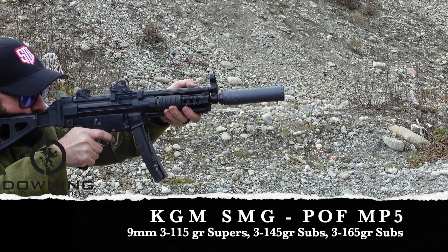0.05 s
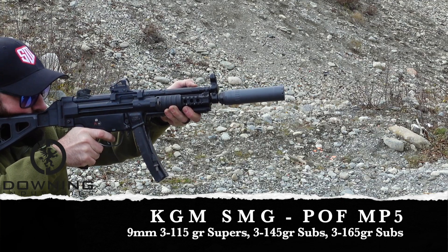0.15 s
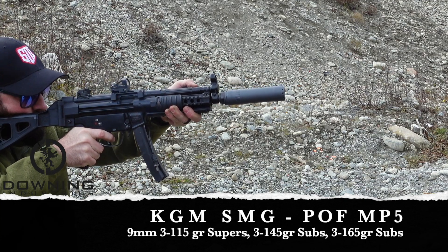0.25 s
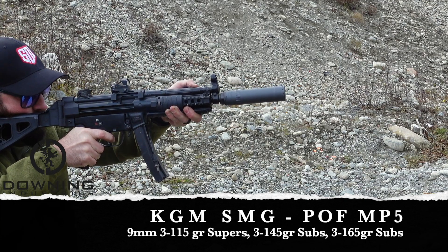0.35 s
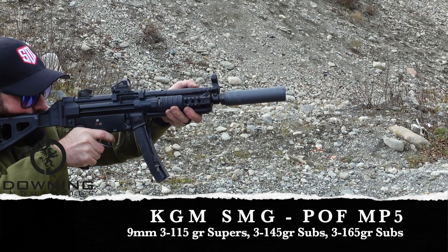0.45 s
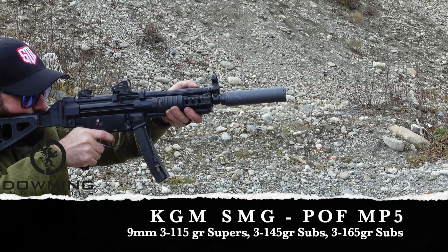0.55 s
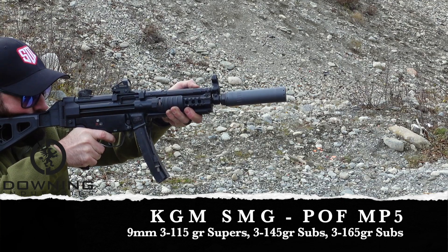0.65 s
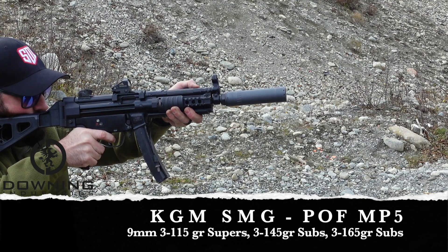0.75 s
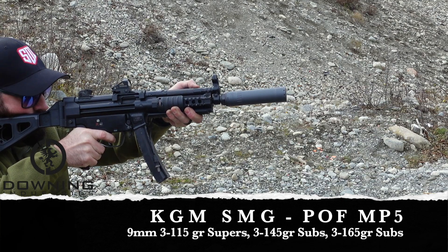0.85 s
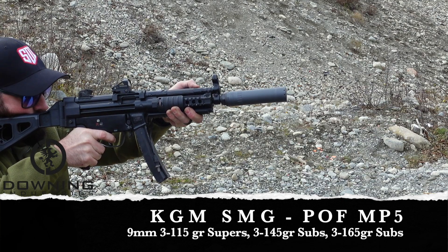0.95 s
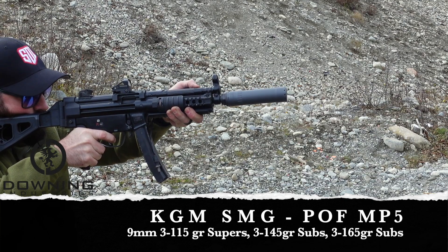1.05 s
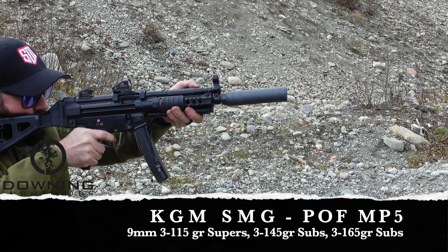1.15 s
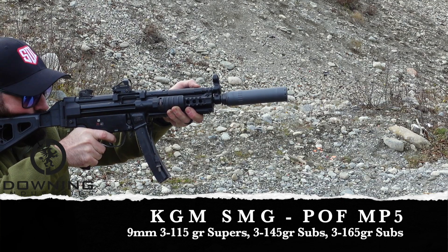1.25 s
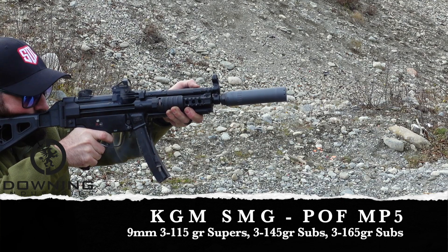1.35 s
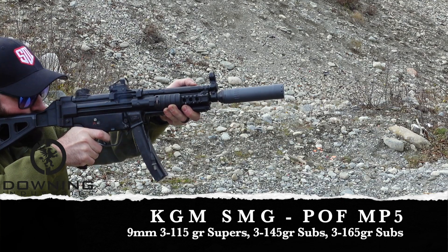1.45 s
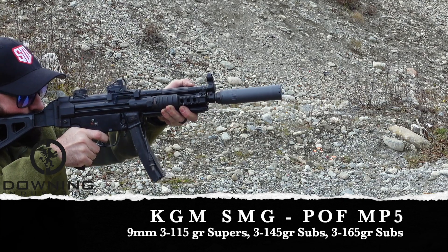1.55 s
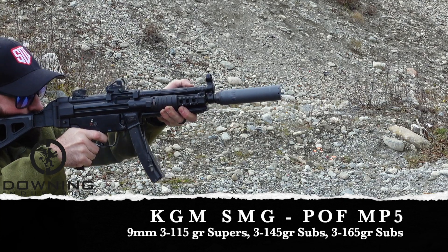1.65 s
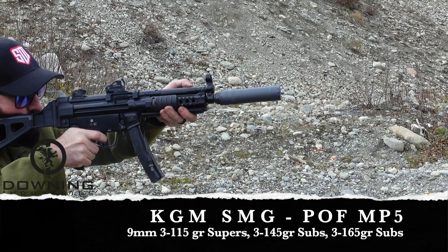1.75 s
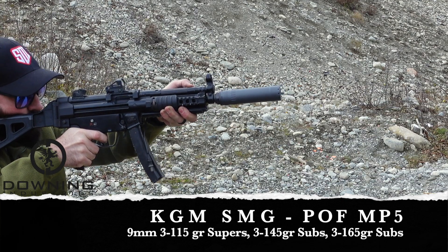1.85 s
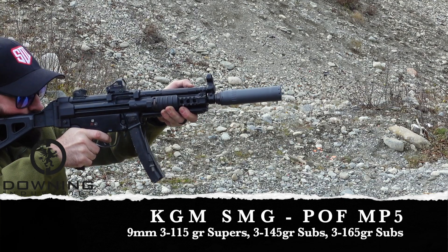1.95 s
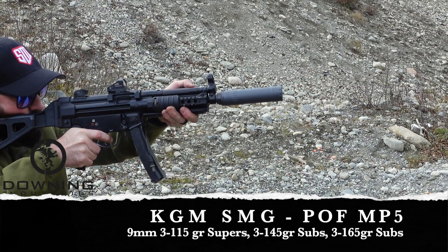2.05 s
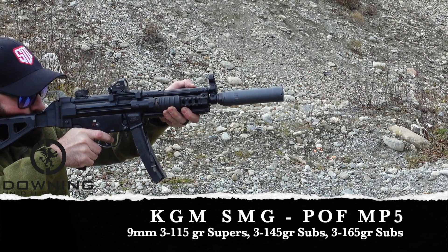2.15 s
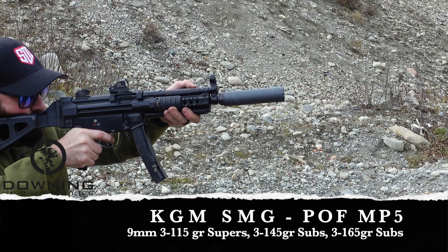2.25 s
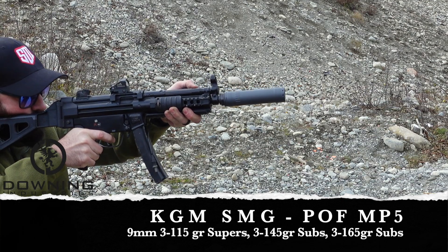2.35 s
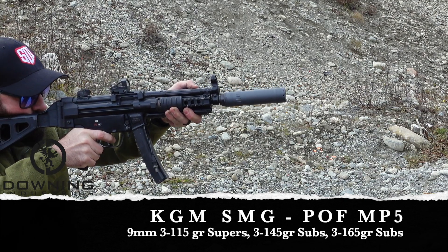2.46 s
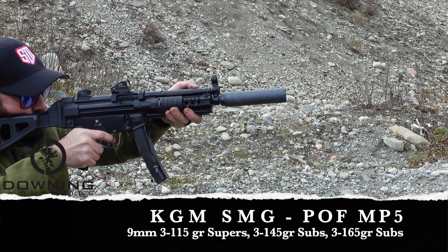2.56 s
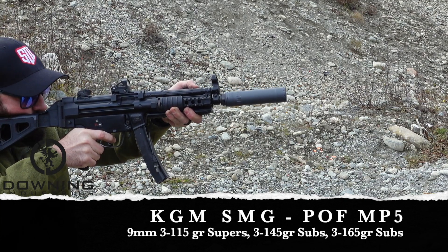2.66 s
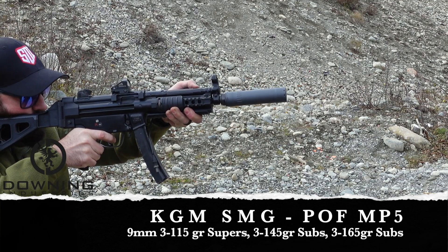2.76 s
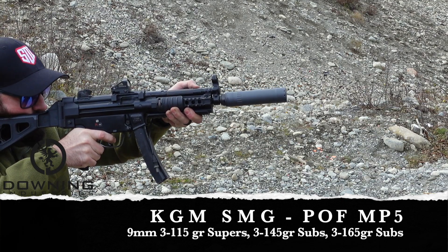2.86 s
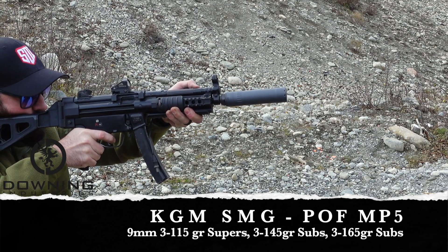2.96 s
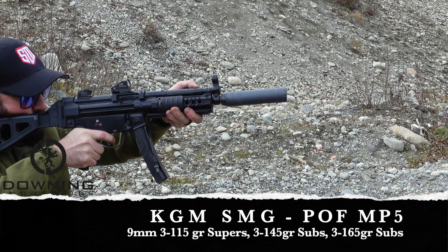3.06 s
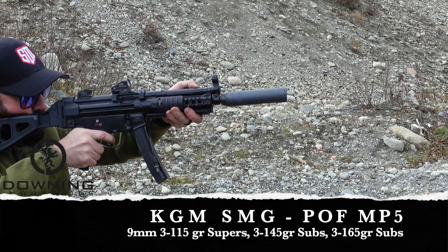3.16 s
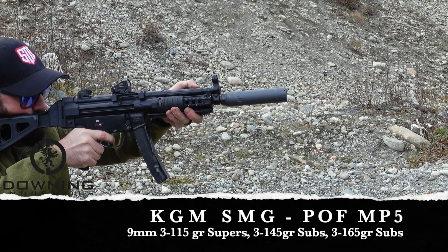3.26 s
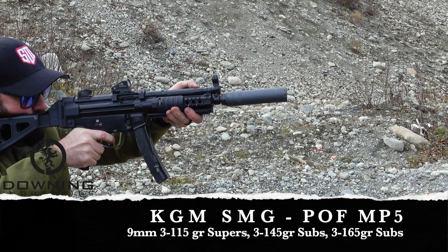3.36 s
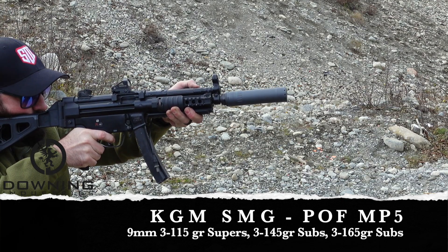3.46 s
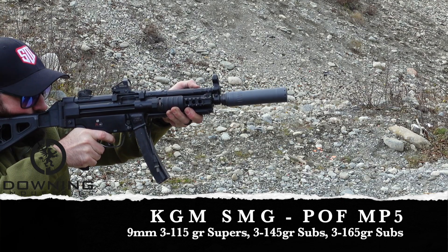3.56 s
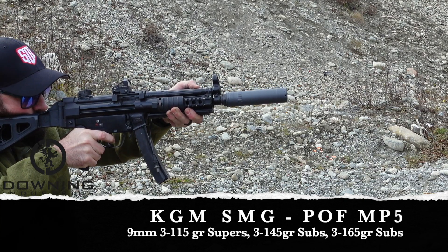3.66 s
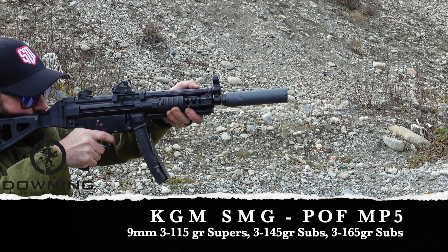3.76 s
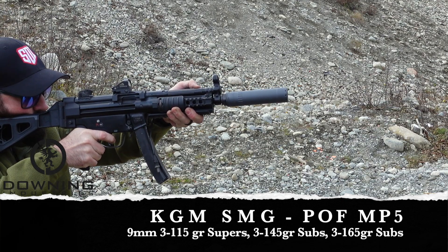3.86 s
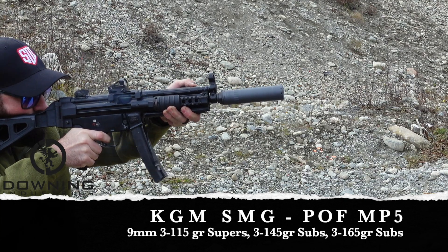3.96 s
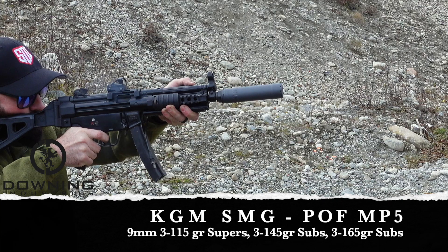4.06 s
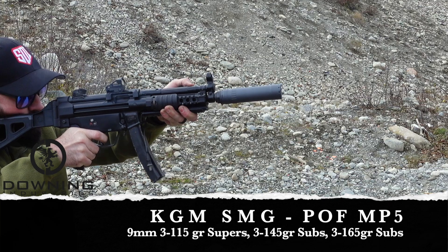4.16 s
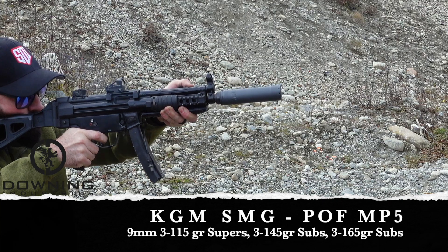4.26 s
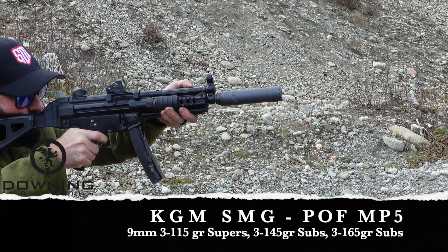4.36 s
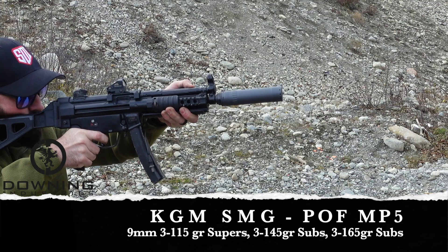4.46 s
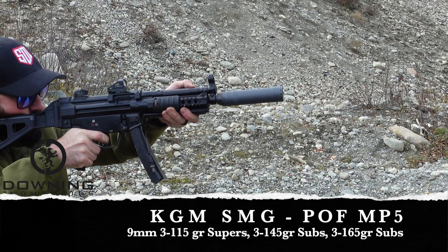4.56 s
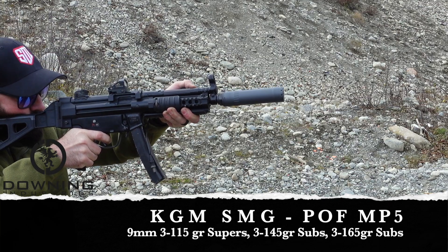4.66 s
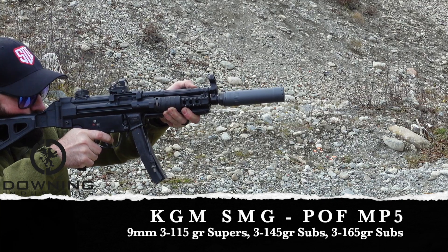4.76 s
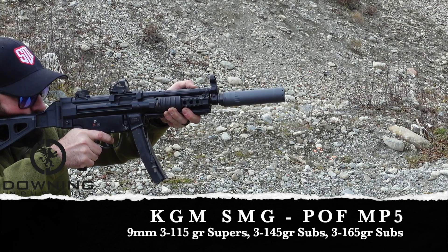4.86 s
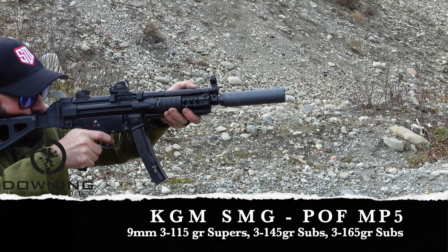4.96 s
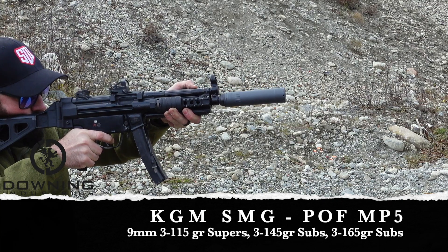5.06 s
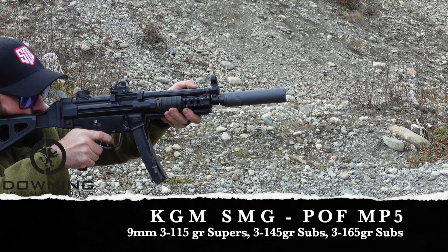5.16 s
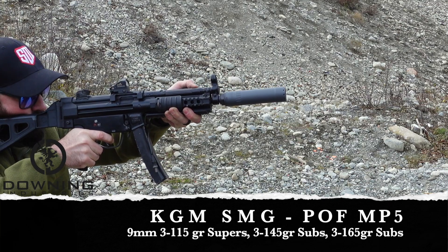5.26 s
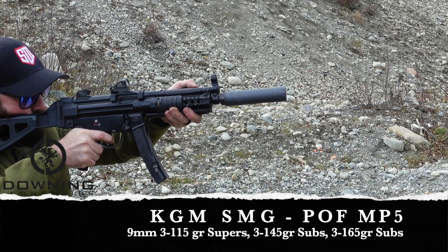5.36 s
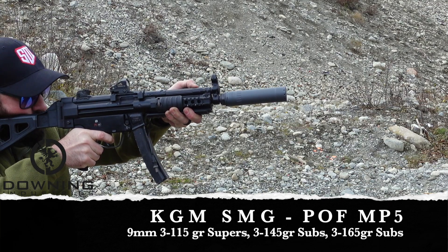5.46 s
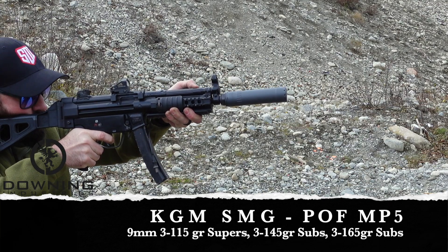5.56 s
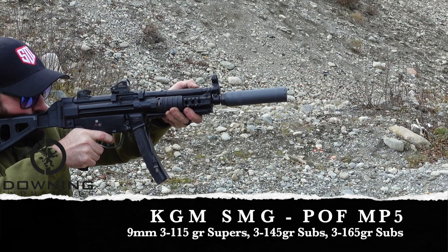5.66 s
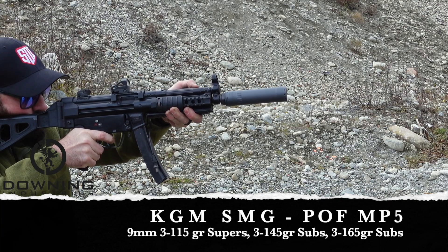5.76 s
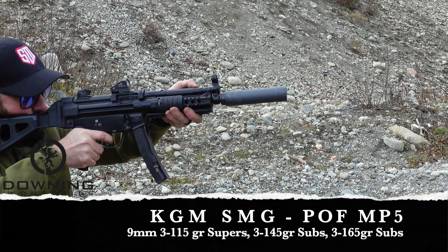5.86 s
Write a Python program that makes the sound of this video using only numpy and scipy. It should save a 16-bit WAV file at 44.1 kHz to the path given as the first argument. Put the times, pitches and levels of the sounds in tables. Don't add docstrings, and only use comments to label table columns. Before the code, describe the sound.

Two muffled carbine shots, seconds apart in a stony outdoor hollow, each with a metallic bolt clatter, rolling echo and a trigger reset click.

```python
import sys
import numpy as np
from scipy import signal
from scipy.fft import rfft, irfft
from scipy.io import wavfile
from scipy.ndimage import map_coordinates

SR = 44100
rng = np.random.default_rng(int(sys.argv[2]) if len(sys.argv) > 2 else 0)


def attenuation_scalar(level_db):
    decades = np.asarray(level_db, float) / 20
    return 10 ** decades


def persist_wave(psi):
    counts = np.round(np.clip(psi, -1, 1) * 32767).astype(np.int16)
    wavfile.write(sys.argv[1], SR, np.atleast_2d(counts).T)


N = 260631


def rms_one(x):
    return x / np.sqrt(np.mean(x ** 2) + 1e-20)


def at_hz(points, hz):
    table_hz, table_db = np.array(points).T[:2]
    return np.interp(np.log(hz), np.log(table_hz), table_db)


def ring(x, hz, t60_s):
    radius = attenuation_scalar(-60 / (max(t60_s, 1e-4) * SR))
    turn = 2 * np.pi * hz / SR
    return signal.lfilter([0, np.sin(turn)], [1, -2 * radius * np.cos(turn), radius ** 2], x)


def low_pass(x, hz):
    return signal.lfilter(*signal.butter(2, hz, fs=SR), x)


def high_pass(x, hz):
    return signal.lfilter(*signal.butter(2, hz, "high", fs=SR), x)


def add(out, start_s, sound):
    i = round(start_s * SR)
    out[i:i + len(sound)] += sound[:N - i]


def coloured(spectrum):
    hz = np.maximum(np.arange(N // 2 + 1) * SR / N, 5)
    return rms_one(irfft(rfft(rng.standard_normal(N)) * attenuation_scalar(at_hz(spectrum, hz)), N))


def drift(rate_hz):
    steps = rng.standard_normal(400)
    return map_coordinates(steps, [np.arange(N) / SR * rate_hz], order=3)


NEAR_DB, NEAR_FALL_DB_S = -42, 45
SLOPE_S, SLOPE_RISE_DB_S, SLOPE_FALL_DB_S = .17, 110, 213
HOLLOW_FALL_DB_S, RIM_FALL_DB_S, FAR_FALL_DB_S = 13, 58.6, 17


def echo_level(age_s, slope_db, hollow_db, rim_s, far_db):
    early_s = np.clip(SLOPE_S - age_s, 0, 9)
    late_s = np.clip(age_s - SLOPE_S, 0, 9)
    past_rim_s = np.clip(age_s - rim_s, 0, 9)
    rise_db = SLOPE_RISE_DB_S * early_s
    near = NEAR_DB - NEAR_FALL_DB_S * age_s
    slope = slope_db - rise_db - SLOPE_FALL_DB_S * late_s
    hollow = hollow_db - rise_db - HOLLOW_FALL_DB_S * age_s - RIM_FALL_DB_S * past_rim_s
    far = far_db - rise_db - FAR_FALL_DB_S * age_s
    return np.sqrt(attenuation_scalar(near) ** 2 + attenuation_scalar(slope) ** 2 + attenuation_scalar(hollow) ** 2 + attenuation_scalar(far) ** 2)


# shot_s, slope_db, hollow_db, rim_s (last return from the rim), far_db
ECHO_SHOTS = [
    (-.5, -23, -33.5, 0.59, -44.5),
    (1.385, -30, -32, 0.52, -45.5),
    (3.961, -43.5, -46, .68, -77.5),
]
# pitch_hz, density_db_per_hz
FAST_ECHO = [(59, -52), (100, -18.5), (330, -7), (1600, 0.5), (2600, -4), (3600, -3), (10500, -14),
             (16000, -31.5)]
# pitch_hz, density_db_per_hz
SLOW_ECHO = [(59, -38), (100, -6), (255, -3), (2950, 0), (3700, -6), (4800, -2), (10900, -14.5),
             (16000, -26.5)]
# pitch_hz, extra_loss_db_per_s
ECHO_LOSS = [(100, 110.5), (280, 40.5), (500, 13.5), (1400, -2.5), (3600, 16), (6500, 41.5), (11000, 92),
             (16000, 133)]
FAR_LOSS_SHARE = .5


def echoes():
    t = np.arange(N) / SR
    out, level, age_s = np.zeros(N), np.zeros(N), np.zeros(N)
    for shot_s, *strengths in ECHO_SHOTS:
        after = t >= shot_s
        since_s = t[after] - shot_s
        level[after] = echo_level(since_s, *strengths)
        beyond_s = np.clip(since_s - strengths[2], 0, 9)
        age_s[after] = since_s - .13 - (1 - FAR_LOSS_SHARE) * beyond_s
    white = rng.standard_normal((2, N))
    together = drift(36)
    slow = t >= ECHO_SHOTS[-1][0]
    edges_hz = 70 * 2 ** np.arange(0, 8.1, 1 / 3)
    for k, (low, high) in enumerate(zip(edges_hz, edges_hz[1:])):
        sos = signal.butter(3, [low, high], "band", fs=SR, output="sos")
        band = signal.sosfilt(sos, white[k % 2])
        hz = np.sqrt(low * high)
        colour_db = np.where(slow, at_hz(SLOW_ECHO, hz), at_hz(FAST_ECHO, hz))
        flutter_db = .5 * together + .6 * drift(25)
        out += band * attenuation_scalar(colour_db - at_hz(ECHO_LOSS, hz) * age_s + flutter_db)
    return attenuation_scalar(16.0) * level * out


# pitch_hz, density_db_per_hz
AIR = [(12, -30), (20, 1), (55, -10.5), (133, -13), (261, -14.5), (419, -13), (469, -14), (775, -17),
       (1510, -20), (2800, -30.5), (5620, -36.5), (14100, -40.5), (15800, -41.5)]
AIR_DB = -63.5
# pitch_hz, rms_db
WHINE = [(11461, -102), (13878, -96)]


def air():
    t = np.arange(N) / SR
    whine = sum(np.sqrt(2) * attenuation_scalar(db) * np.sin(2 * np.pi * hz * t) for hz, db in WHINE)
    return attenuation_scalar(AIR_DB + 0.83 * drift(12.0)) * coloured(AIR) + whine


# start_s, peak_db, pitch_hz, t60_s
THUDS = [(0.489, -58, 210, 0.068), (1.556, -17, 447, 0.035), (1.559, -17, 1150, 0.05),
         (1.565, -15.5, 585, 0.026), (1.569, -18, 1100, 0.021), (1.574, -44, 136, 0.086),
         (1.658, -23, 1500, 0.061), (1.733, -54.5, 60, .12), (2.56, -50.5, 600, 0.024),
         (4.129, -48, 1830, .03), (4.136, -28, 658, 0.061), (4.138, -26, 1100, .03),
         (4.146, -46, 115, 0.075), (4.319, -55, 56.2, .12), (5.263, -47, 530, 0.025)]


def thuds():
    out, t = np.zeros(N), np.arange(6000) / SR
    noises = rng.standard_normal((len(THUDS), len(t)))
    for (start_s, peak_db, hz, t60_s), noise in zip(THUDS, noises):
        puff = low_pass(low_pass(noise, 5.6 * hz), 4.8 * hz)
        puff = puff * (1 - attenuation_scalar(-60 * t * hz / 3.8)) * attenuation_scalar(-60 * t * hz / 13.0)
        sound = rms_one(ring(puff, hz, t60_s)) + .4 * rms_one(puff)
        sound = high_pass(sound, .7 * hz)
        add(out, start_s, attenuation_scalar(peak_db) * sound / np.abs(sound).max())
    return out


def contacts(rows, modes, bare_db=0):
    out, t = np.zeros(N), np.arange(9000) / SR
    shape = (len(rows), len(t))
    grains = rng.standard_normal(shape) * attenuation_scalar(1.6 * rng.exponential(1, shape))
    strengths_db = rng.normal(0, 3, (len(rows), len(modes)))
    for (start_s, peak_db, hz, rise_s, t60_s, body_db), grain, strength_db in zip(rows, grains, strengths_db):
        rise_s = max(rise_s, 1e-4)
        fall = attenuation_scalar(-60 * np.clip(t - rise_s, 0, 1) / max(t60_s, .001))
        clicks = grain * np.clip(t / rise_s, 0, 1) ** 2 * fall
        body = sum(attenuation_scalar(mode_db + d) * ring(clicks, mode_hz, mode_t60_s)
                   for (mode_hz, mode_db, mode_t60_s), d in zip(modes, strength_db))
        bare = high_pass(low_pass(clicks, 12500), 1900)
        own_ring = ring(clicks, hz, 0.0024)
        sound = attenuation_scalar(bare_db) * rms_one(bare) + attenuation_scalar(-0.5) * rms_one(own_ring) + attenuation_scalar(body_db) * rms_one(body)
        sound = high_pass(sound, 870)
        add(out, start_s, attenuation_scalar(peak_db) * sound / np.abs(sound).max())
    return out


# start_s, peak_db, pitch_hz, t60_s
TICKS = [(.500, -56, 7500, .04), (.5006, -53, 11000, .045), (.502, -51, 14800, .04),
         (2.860, -62, 3290, .033), (3.615, -58, 3730, .05), (5.1244, -58, 4450, .015),
         (5.213, -56, 3600, .07), (5.222, -57, 4400, .045)]
TICK_RISE_SHARE, TICK_BODY_DB, TICK_BARE_DB = .14, -15, -6
# catch_s, catch_db, touch_db, rebound_db (peaks)
RESETS = [
    (1.9930, -7, -26, -17.5),
    (4.7151, -5.5, -25, -15.5),
]
TOUCH_LEAD_S, TOUCH_HZ, TOUCH_T60_S = .0041, 2500, 0.0093
CATCH_HZ, CATCH_T60_S = 4730, 0.0073
RESET_RISE_S, RESET_BODY_DB = .001, -6
# delay_s, level_db (re the reset's rebound_db), pitch_hz, t60_s
REBOUNDS = [
    (.005, 2, 5630, 0.013),
    (.011, -14.5, 6830, 0.02),
    (.016, -29, 4020, 0.13),
]
# pitch_hz, level_db, t60_s
SEAR = [(1100, 1, 0.015), (1337, 0.5, 0.013), (2760, 6, 0.011), (4300, 3.5, 0.0051), (6000, -4, 0.0046),
        (10770, -38, 0.0087)]
# pitch_hz, level_db (re blow), t60_s
HOUSING = [(620, -21, .012), (806, -13, .034), (1270, -13, .013), (2610, -52, .2), (3900, -52, .18),
           (4550, -49, .17), (6300, -56, 0.14)]


def trigger():
    rows, blows = [], np.full(N, 1e-18)
    for catch_s, catch_db, touch_db, rebound_db in RESETS:
        steps = [(-TOUCH_LEAD_S, touch_db, TOUCH_HZ, TOUCH_T60_S), (0, catch_db, CATCH_HZ, CATCH_T60_S)]
        steps += [(delay_s, rebound_db + db, hz, t60_s) for delay_s, db, hz, t60_s in REBOUNDS]
        rows += [(catch_s + delay_s, db, hz, RESET_RISE_S, t60_s, RESET_BODY_DB)
                 for delay_s, db, hz, t60_s in steps]
        blow_s = catch_s + RESET_RISE_S
        add(blows, blow_s, [attenuation_scalar(catch_db)])
        add(blows, blow_s + REBOUNDS[0][0], [attenuation_scalar(rebound_db)])
    knocks = sum(attenuation_scalar(db) * ring(blows, hz, t60_s) for hz, db, t60_s in HOUSING)
    knocks = high_pass(high_pass(knocks, 600), 550)
    ticks = [(start_s, db, hz, TICK_RISE_SHARE * t60_s, t60_s, TICK_BODY_DB)
             for start_s, db, hz, t60_s in TICKS]
    return contacts(rows, SEAR) + knocks + contacts(ticks, SEAR, TICK_BARE_DB)


# lead_s, peak_db, pitch_hz, t60_s
HAMMER = [
    (.0092, -5, 2700, 0.01),
    (.008, -10, 1100, 0.01),
]
HAMMER_RISE_S, HAMMER_BODY_DB = .0003, -5
# start_s, peak_db, pitch_hz,
# t60_s
BOLT = [(1.3953, -11, 5668, .04), (1.4108, -6, 1772, .008), (1.4362, -11, 3000, .02),
        (1.4381, -2, 2634, .015), (1.441, -5, 6070, 0.027), (1.4424, -8, 4054, .018),
        (1.4464, 4, 4643, .013), (1.4512, -14.5, 2403, .05), (1.4757, -13.5, 3870, .016),
        (1.4815, -14, 3450, .03), (1.5155, -11.5, 4300, .027), (1.5262, -24.5, 3980, .012),
        (3.9677, -5.5, 4860, 0.033), (3.9827, -8.5, 4470, .009), (3.9844, -11.5, 1940, 0.031),
        (3.9959, -19.5, 1805, .023), (4.0048, -4, 2930, 0.013), (4.0068, 2, 7210, 0.008),
        (4.0094, 1, 3960, .02), (4.015, -0.5, 9286, .011), (4.0163, -3, 7338, .016),
        (4.0225, -9, 4350, .021), (4.0365, -21.5, 4790, 0.018), (4.102, -19, 10200, 0.0094),
        (4.1051, -19.5, 10000, .008), (4.112, -29, 7680, .04)]
BOLT_RISE_S, BOLT_BODY_DB = .0011, -4
# pitch_hz, level_db, t60_s
RECEIVER = [(1150, -6, 0.011), (2050, -2.5, 0.015), (2650, -6, 0.0017), (3710, -6, 0.014),
            (4440, -3, 0.0029), (6220, -4, 0.01), (7470, 1, 0.016), (9300, -7, 0.0076), (10900, -11, 0.012),
            (12700, -10, .008)]


def action():
    hammer = [(blast[0] - lead_s, db, hz, HAMMER_RISE_S, t60_s, HAMMER_BODY_DB)
              for blast in BLASTS for lead_s, db, hz, t60_s in HAMMER]
    bolt = [(start_s, db, hz, BOLT_RISE_S, t60_s, BOLT_BODY_DB) for start_s, db, hz, t60_s in BOLT]
    return contacts(hammer + bolt, RECEIVER)


# start_s, top_db, first_baffle_hz, last_baffle_hz
BLASTS = [
    (1.3859, -1.5, 1300, 6000),
    (3.9624, -2, 1252, 5606),
]


def blasts():
    out, t = np.zeros(N), np.arange(4000) / SR
    noises = rng.standard_normal((len(BLASTS), len(t)))
    for (start_s, top_db, first_hz, last_hz), noise in zip(BLASTS, noises):
        hz = np.interp(t, [0, .0009, .0022, .0034], [first_hz, 2800, 3100, last_hz])
        jitter = 1.5 * high_pass(low_pass(noise, 3000), 300)
        pops = np.sin(2 * np.pi * np.cumsum(hz * (1 + jitter)) / SR)
        hiss = .55 * low_pass(noise[::-1], 7000)
        jet = pops * attenuation_scalar(-60 * (t / 0.04) ** 2.1) + hiss
        drive = 8.5 * attenuation_scalar(-60 * t / 0.077) * np.clip(t / 0.000057, 0, 1) ** 3
        add(out, start_s, attenuation_scalar(top_db) * np.tanh(drive * jet) * attenuation_scalar(-60 * t / 0.054))
        bounce = np.tanh(11.0 * np.sin(2 * np.pi * 560 * t + 1.7)) * attenuation_scalar(-60 * t / 0.0096)
        add(out, start_s + .0061, attenuation_scalar(-3.5) * low_pass(bounce, 5000))
        push = attenuation_scalar(-5) * np.sin(2 * np.pi * 112 * t) * attenuation_scalar(-60 * t / 0.03)
        add(out, start_s + .0024, -push)
        deep_push = attenuation_scalar(-22.5) * np.sin(2 * np.pi * 55 * t) * attenuation_scalar(-60 * t / 0.012)
        add(out, start_s + 0.003, -deep_push)
    return out


# start_s, end_s, level_db
SLIDES = [
    (1.387, 1.455, -21.5),
    (3.986, 4.017, -22.5),
]
# pitch_hz, density_db_per_hz
SCRAPE = [(120, -38), (200, -7), (735, 2), (3560, -4), (3760, -5.5), (4860, -8), (8900, -15.5),
          (14900, -16), (16000, -20)]


def slides():
    t, gate = np.arange(N) / SR, np.zeros(N)
    for start_s, end_s, db in SLIDES:
        gate += attenuation_scalar(db) * (t > start_s) * attenuation_scalar(-60 * np.clip(t - end_s, 0, 1) / .012)
    grain = attenuation_scalar(1.1 * low_pass(rng.standard_normal(N), 500) * 2.5)
    return gate * grain * coloured(SCRAPE)


def scene():
    gun = blasts() + action() + trigger() + slides()
    return (gun + thuds() + echoes() + air())[None]


def band_limit(x):
    return signal.sosfilt(signal.butter(12, 16650, fs=SR, output="sos"), x)


def record(dry):
    top_cut = signal.cheby2(10, 45, 15900 * 1.03, fs=SR, output="sos")
    mix = np.clip(signal.sosfilt(top_cut, dry), -1, 1)
    return band_limit(mix)


dry = scene()
out = record(dry)
persist_wave(out)
```